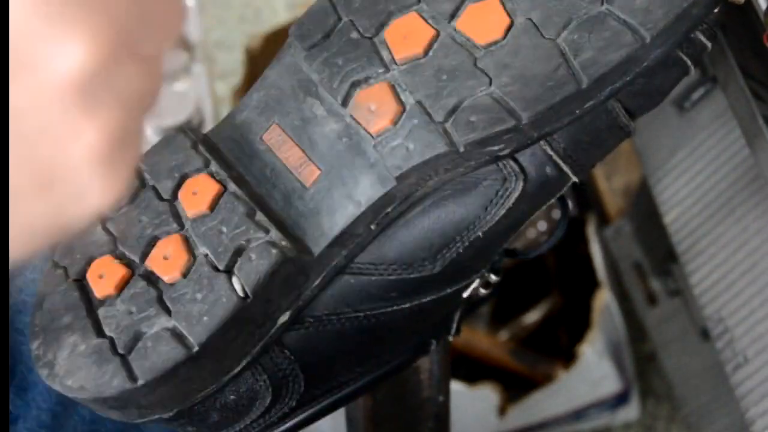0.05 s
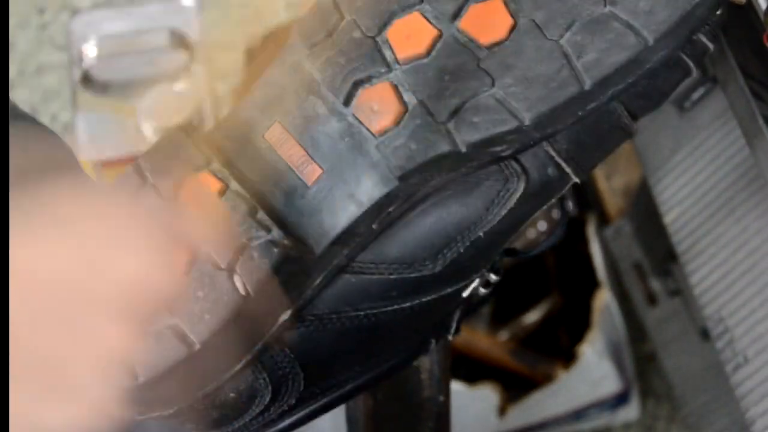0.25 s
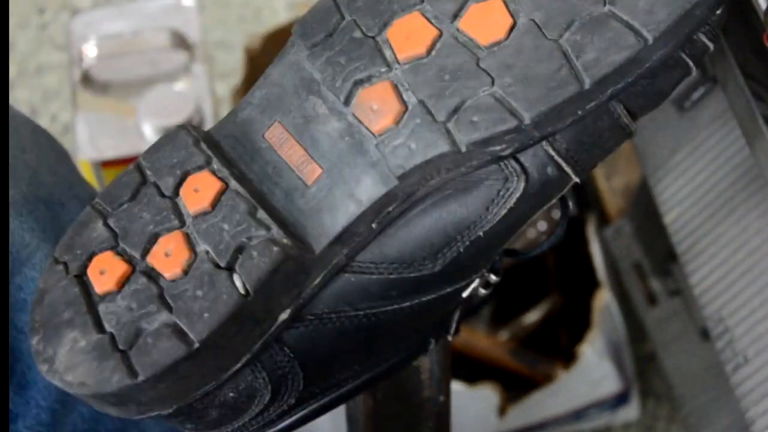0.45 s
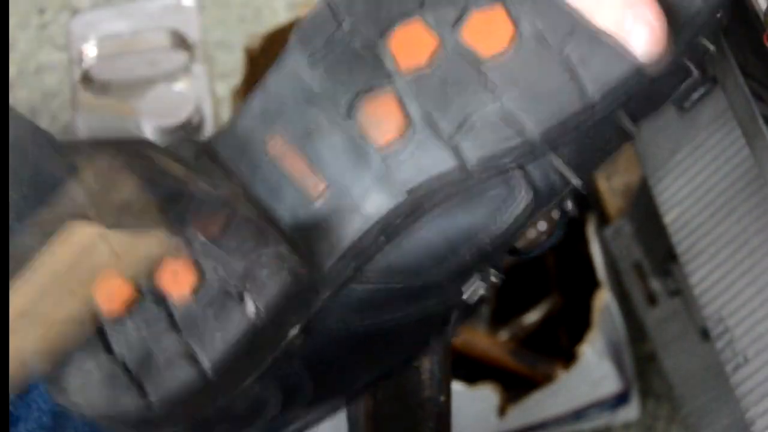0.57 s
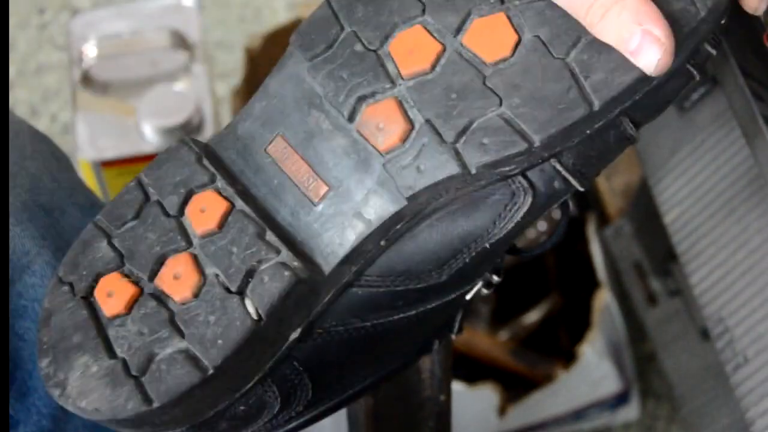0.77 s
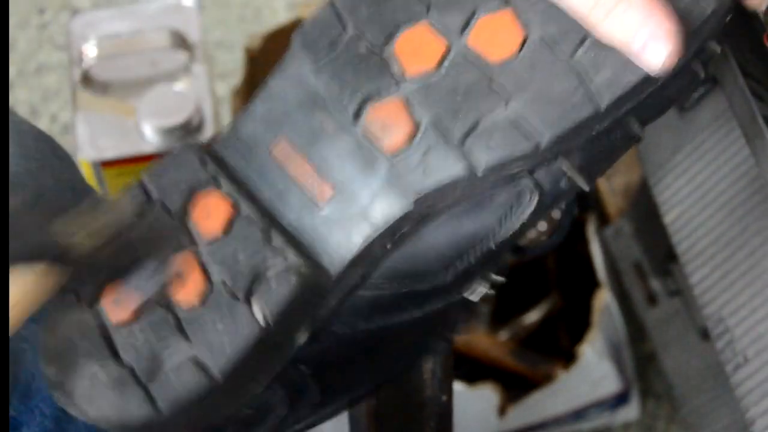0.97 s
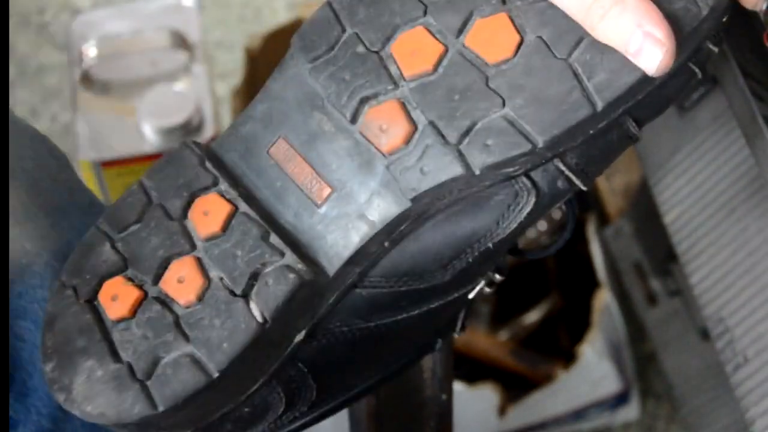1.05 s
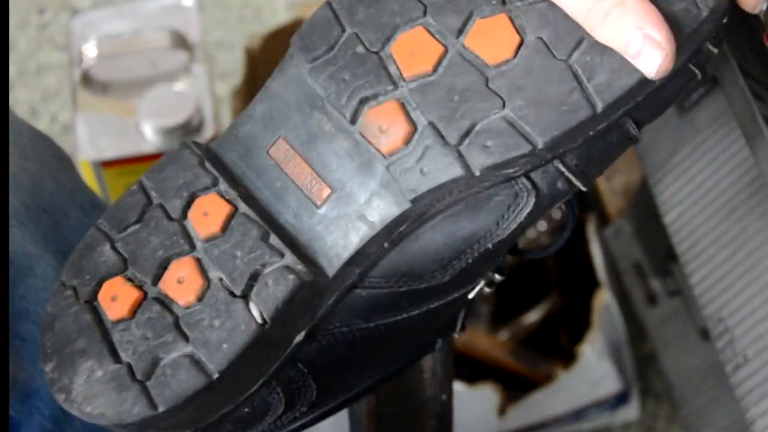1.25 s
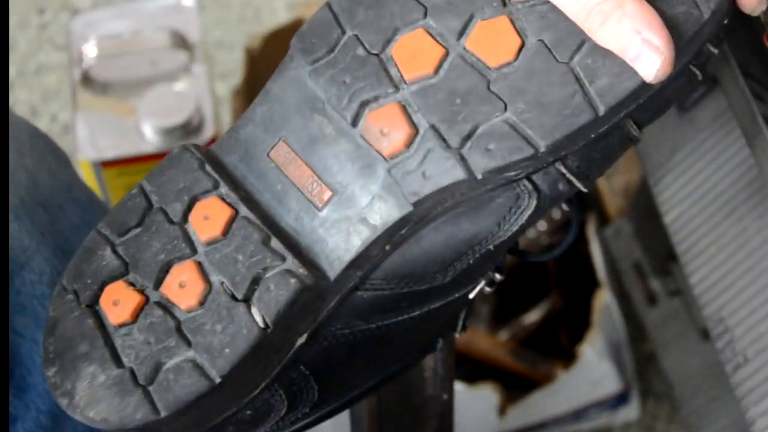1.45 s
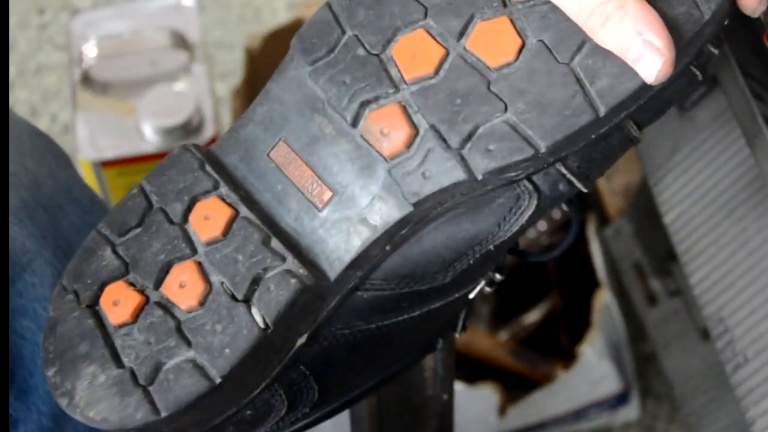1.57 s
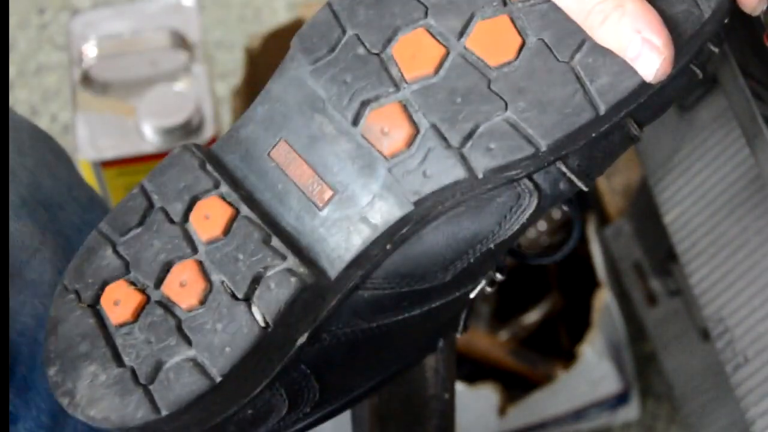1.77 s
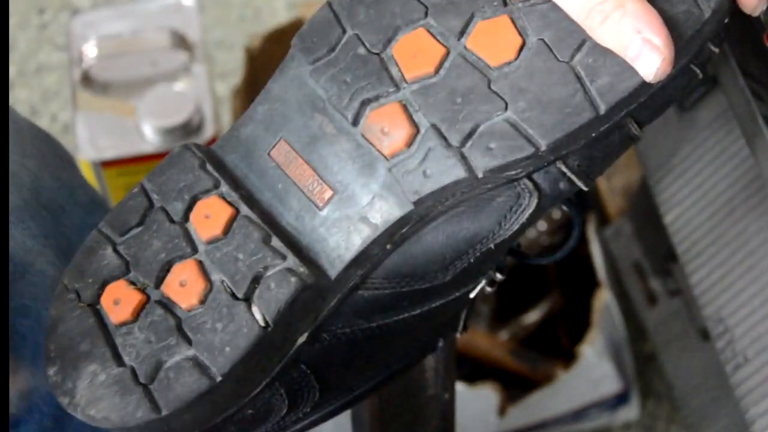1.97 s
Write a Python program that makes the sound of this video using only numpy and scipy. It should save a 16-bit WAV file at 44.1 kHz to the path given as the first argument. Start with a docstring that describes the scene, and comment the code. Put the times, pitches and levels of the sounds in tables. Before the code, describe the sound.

Hammering on a boot sole: sharp rubber slaps with hollow thuds and short iron ring, some with loose rattles, evenly spaced over a low fan hum in a small room, close and slightly clipped.

```python
"""Hand hammer beating a rubber boot sole on an iron stand in a small workshop, close to an overloading camera.
A low hum of workshop air, with a fan drone near 120 Hz, runs throughout: shaped noise.
A blow just before the start is still dying away; five more follow, about 0.37 s apart.
Each slaps (noisy pulse), thuds in the sole, booms in the hollow and rings the iron (dying sines); the room answers.
Some blows carry a bright snap or are followed by rattles; faint handling snaps and one noise scuff fall between."""
import sys
import numpy as np
from scipy import signal
from scipy.io import wavfile
from scipy.ndimage import uniform_filter1d

SR = 44100
rng = np.random.default_rng(int(sys.argv[2]) if len(sys.argv) > 2 else 0)


def natural_amplitude(level_db):
    """Convert a level in decibels to a linear amplitude factor, elementwise."""
    exponent = np.asarray(level_db, float) / 20
    return 10 ** exponent


def generate_wav(sig):
    """Save sig (samples, or channels by samples) to the path in sys.argv[1] as 16-bit PCM at SR."""
    pcm = np.round(np.clip(np.atleast_2d(sig).T, -1, 1) * 32767).astype(np.int16)
    wavfile.write(sys.argv[1], SR, pcm)


N = 88200
LEAD = SR // 4  # samples kept ahead of time zero for the early blow


def read(points, hz):
    """Interpolates a table on a log-frequency axis."""
    f, value = np.transpose(points)
    return np.interp(np.log(hz + 1), np.log(f + 1), value)


def add(mix, start_s, sound):
    """Lays a sound into a mix that starts LEAD samples early."""
    part = mix[LEAD + round(start_s * SR):][:len(sound)]
    part += sound[:len(part)]


def ring(modes, contact_s):
    """Exponentially dying sines, building up over about a cycle, struck by a half-sine push."""
    build_cycles = 1
    t = np.arange(SR // 4) / SR
    hz, db, t60_s = np.transpose(modes)[:, :, None]
    push = np.sin(np.pi * np.clip(t[:100] / contact_s, 0, 1))
    push[0] += 1e-3  # keeps the sum above zero
    build = 1 - np.exp(-t * hz / build_cycles)
    decay = natural_amplitude(db - 60 * t / t60_s)
    sines = build * decay * np.sin(2 * np.pi * hz * t)
    return np.convolve(sines.sum(0), push / push.sum())


def click(db, hz, t60_s):
    """One short ring whose contact time scales with its period."""
    contact_cycles = 0.53
    return ring([(hz, db, t60_s)], contact_cycles / hz)


# Workshop air with a fan drone near 120 Hz. Each row: frequency in Hz, relative density in dB per Hz.
AIR_SPECTRUM = [(20, -33), (40, 0.5), (62, -3.5), (100, -5.5), (122, -1), (150, -11.5), (250, -10.5),
                (350, -9.5), (500, -14.5), (700, -9.5), (1000, -26.5), (1300, -17.5), (2000, -26),
                (3200, -31), (5000, -40), (8000, -56.5), (13000, -64)]
AIR_RMS_DB, AIR_PATCH_DB = -49, 1.2  # patch: standard deviation


def air():
    """Steady shaped noise whose spectrum drifts in faint patches."""
    frames, hz = N // 512 + 5, np.fft.rfftfreq(2048, 1 / SR)
    real, imag, patches = rng.standard_normal((frames, 1025, 3)).T
    patches = uniform_filter1d(patches, 8, 0)
    patches = uniform_filter1d(patches, 6, 1)
    gain_db = read(AIR_SPECTRUM, hz)[:, None] + AIR_PATCH_DB * patches / patches.std()
    x = signal.istft((real + 1j * imag) * natural_amplitude(gain_db), nperseg=2048, noverlap=1536)[1][:N]
    return natural_amplitude(AIR_RMS_DB) * x / x.std()


# Room decay. Each row: frequency in Hz, T60 in s.
ROOM_DECAY = [(100, .6), (250, 0.35), (600, 0.26), (1200, 0.26), (3500, 0.27), (7000, 0.28), (14000, 0.23)]
# Room tail spectrum. Each row: frequency in Hz, relative level in dB.
ROOM_SPECTRUM = [(100, -1), (250, -2.5), (700, 3), (1500, 4), (4000, 2.5), (7000, 3.5), (10000, -6),
                 (14000, -15.5)]
ROOM_DB, ROOM_RISE_S = -11.5, 0.007


def room(x):
    """Adds a diffuse noise tail that rises quickly and dies band by band."""
    hz, t, z = signal.stft(rng.standard_normal(SR), SR, nperseg=256)
    gain_db = read(ROOM_SPECTRUM, hz)[:, None] - 60 * t / read(ROOM_DECAY, hz)[:, None]
    tail = signal.istft(z * natural_amplitude(gain_db), SR, nperseg=256)[1]
    tail = tail * (1 - np.exp(-np.arange(len(tail)) / SR / ROOM_RISE_S))
    tail = natural_amplitude(ROOM_DB) * tail / np.linalg.norm(tail)
    return x + signal.fftconvolve(x, tail)[:len(x)]


# Faint scuff. Each row: start in seconds, length in s, level in dB, centre in Hz, width in Hz.
SCUFF_EVENTS = [(0.537, 0.068, -69, 5030, 1990)]


def scuffs(mix):
    """Puffs of band noise under a raised-cosine envelope."""
    for start_s, length_s, db, hz, width_hz in SCUFF_EVENTS:
        n = round(length_s * SR)
        edges_hz = [hz - width_hz / 2, hz + width_hz / 2]
        band = signal.butter(2, edges_hz, "band", fs=SR, output="sos")
        noise = signal.sosfilt(band, rng.standard_normal(n)) * np.sqrt(SR / 2 / width_hz)
        add(mix, start_s, natural_amplitude(db) * np.hanning(n) * noise)


# Bright snaps at contact and from small handling. Each row: start in seconds, level in dB, pitch in Hz, T60 in s.
SNAP_EVENTS = [(.2484, -8, 8500, .003), (0.624, -12.5, 8000, 0.0014), (.6243, -35, 13000, 0.0068),
               (0.9992, -5, 9000, 0.0012), (1.3646, -2.5, 12000, 0.0022), (1.7151, -47, 12000, 0.0018),
               (0.185, -57.5, 8500, 0.0068), (.1855, -43, 1500, 0.025), (0.526, -58, 7500, 0.0037),
               (0.912, -65, 7000, 0.0047)]


def snaps(mix):
    """Short rings aimed at the microphone, without room."""
    for start_s, *snap in SNAP_EVENTS:
        add(mix, start_s, click(*snap))


# Boot knocks and loose parts after a blow. Each row: start in seconds, level in dB, pitch in Hz, T60 in s.
RATTLE_EVENTS = [(-.09, -35, 4783, 0.29), (.2525, -11, 608, .08), (.2645, -17.5, 2727, 0.049),
                 (.2648, -22, 4620, .02), (.265, -10, 6250, .002), (.282, -10.5, 527, 0.077),
                 (0.64, -16, 1948, 0.045), (.641, -13, 1380, 0.029), (.64, -53, 7170, 0.1)]


def rattles(mix, from_s, to_s):
    """Short rings of the boot and loose parts between one blow and the next."""
    for start_s, *rattle in RATTLE_EVENTS:
        if from_s <= start_s < to_s:
            add(mix, start_s, click(*rattle))


# Rubber slap spectrum. Each row: frequency in Hz, gain in dB.
SLAP_SPECTRUM = [(150, -15), (400, -3.5), (1000, 4), (2200, 10.5), (3000, 1), (4500, -27), (5700, -17.5),
                 (8000, -15), (11000, -23.5), (15000, -33.5)]
SLAP_DB, SLAP_DB_PER_IRON_DB = 11, 0.16  # slap level at iron 0 dB, and its slope
CRUNCH_DB, CRUNCH_T60_S = -23.5, 0.043  # tread noise, relative to the pulse


def slap(iron_db):
    """A sharp pulse trailed by dying tread noise, minimum-phase filtered; louder with the iron."""
    t = np.arange(4096) / SR
    crunch = rng.standard_normal(len(t)) * natural_amplitude(CRUNCH_DB - 60 * t / CRUNCH_T60_S)
    burst = natural_amplitude(SLAP_DB + SLAP_DB_PER_IRON_DB * iron_db) * ((t == 0) + crunch)
    log_gain = np.log(natural_amplitude(read(SLAP_SPECTRUM, abs(np.fft.fftfreq(len(t), 1 / SR)))))
    response = np.exp(np.conj(signal.hilbert(log_gain)))  # minimum phase
    return np.fft.ifft(np.fft.fft(burst) * response).real


# Bench under the stand. Each row: pitch in Hz, level in dB, T60 in s.
BENCH_MODES = [(129.6, -14.5, 0.11), (170.4, -12, 0.052), (216.8, -6, 0.055), (283.1, -16, 0.072)]
# Iron stand. Each row: pitch in Hz, level in dB before the blow's iron level, T60 in s.
IRON_MODES = [(3582, -8, 0.0081), (3725, -17, 0.027), (3996, 1, 0.0086), (4036, -22, 0.022),
              (4237, -26, 0.012), (4442, -16, 0.026), (4887, -20, .03)]
# Air in the boot. Each row: multiple of the hollow pitch, level in dB before the blow's hollow level, T60 in s.
HOLLOW_MODES = [(1.001, 4, 0.026), (1.198, -8, 0.055), (1.382, -4.5, 0.039), (1.601, -8.5, .05)]
# Sole, stiffening with the hollow from spot to spot. Each row: multiple of the hollow pitch, level in dB, T60 in s.
SOLE_MODES = [(1.8, -8.5, 0.027), (2.43, 0.5, 0.028), (3.05, -10.5, 0.03), (3.6, -11, 0.028),
              (4.1, -5.5, 0.018), (4.7, -10.5, 0.0092), (5.6, -8, 0.0059), (6.6, -28.5, 0.014),
              (7.8, -10.5, 0.036)]
SOLE_CONTACT_S, IRON_CONTACT_S = 0.00028, 0.0001
SPOT_DB = 2  # standard deviation of mode levels between landing spots


def blow(force_db, hollow_hz, hollow_db, iron_db):
    """Sole, boot hollow, bench and iron stand ring as struck modes together with the slap."""
    def spot(modes):
        spread_db = SPOT_DB * rng.standard_normal(len(modes))
        return np.c_[0 * spread_db, spread_db, 0 * spread_db]

    pitch = np.array([hollow_hz, 1, 1])
    sole = SOLE_MODES * pitch + spot(SOLE_MODES)
    hollow = HOLLOW_MODES * pitch + [0, hollow_db, 0]
    iron = IRON_MODES + spot(IRON_MODES)
    sound = ring(np.r_[sole, hollow, BENCH_MODES], SOLE_CONTACT_S)
    sound = sound + natural_amplitude(iron_db) * ring(iron, IRON_CONTACT_S)
    burst = slap(iron_db)
    sound[:len(burst)] += burst
    return natural_amplitude(force_db) * sound


# Hammer blows. Each row: start in seconds, force in dB, hollow pitch in Hz, hollow level in dB, iron level in dB.
BLOW_EVENTS = [(-.115, 2, 514.4, 1.5, 1), (0.2485, -1.5, 442.8, 7.5, -7), (.6243, -4, 356.2, 3, -7),
               (0.9985, 1, 365, 0, 1), (1.3646, 0, 415.4, 0, 3), (1.7156, -1.5, 412.7, 1.5, -8)]


def blows(mix):
    """Each blow and the rattles after it meet their own draw of the room tail."""
    ends_s = [row[0] for row in BLOW_EVENTS[1:]] + [N / SR]
    for (start_s, *strike), end_s in zip(BLOW_EVENTS, ends_s):
        unechoed = np.zeros(N + LEAD)
        add(unechoed, start_s, blow(*strike))
        rattles(unechoed, start_s, end_s)
        mix += room(unechoed)


DRIVE_DB, BASS_CUT_HZ = 4.5, 82.5


def scene():
    """Blows, snaps and scuff, bass-cut and driven, over the air."""
    mix = np.zeros(N + LEAD)
    blows(mix)
    snaps(mix)
    scuffs(mix)
    # the camera microphone cuts deep bass
    bass_cut = signal.butter(4, BASS_CUT_HZ, "high", fs=SR, output="sos")
    struck = natural_amplitude(DRIVE_DB) * signal.sosfilt(bass_cut, mix)[LEAD:]
    return (struck + air())[None]


def low_pass(x):
    """Removes everything above the highest recorded frequency."""
    return signal.sosfilt(signal.butter(12, 15000, fs=SR, output="sos"), x)


KNEE, EDGE_HZ = 9.0, 14500  # knee: exponent, higher = harder


def record(dry):
    """The camera input overloads with a hard knee, then is band-limited."""
    clipped = dry / (1 + abs(dry) ** KNEE) ** (1 / KNEE)
    lowpass = signal.firwin(255, EDGE_HZ, window=("kaiser", 9), fs=SR)
    limited = signal.oaconvolve(clipped, lowpass[None], "same")
    return low_pass(limited)


dry = scene()
out = record(dry)
generate_wav(out)
```